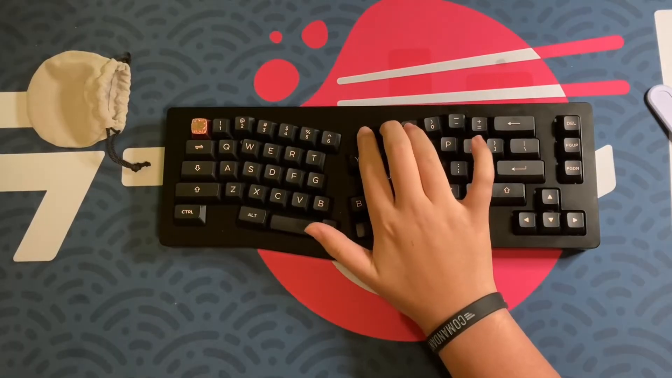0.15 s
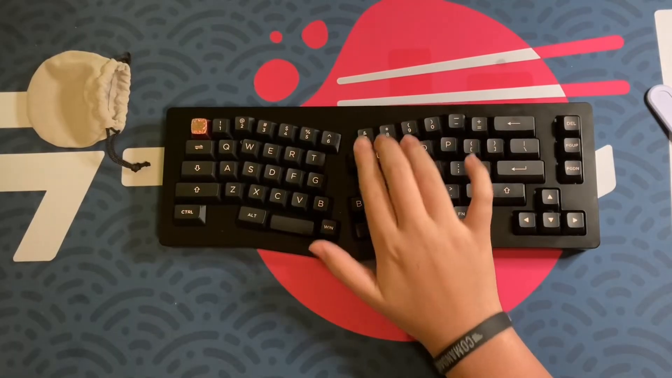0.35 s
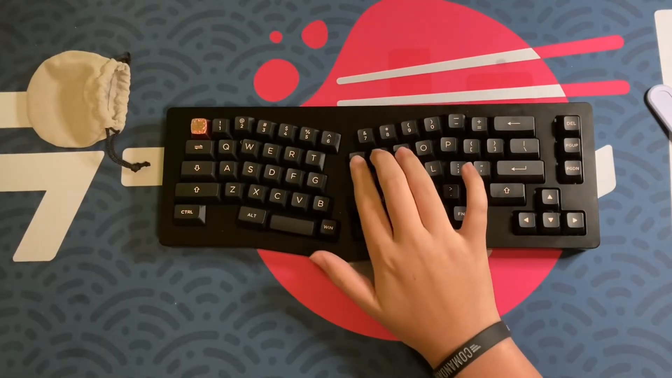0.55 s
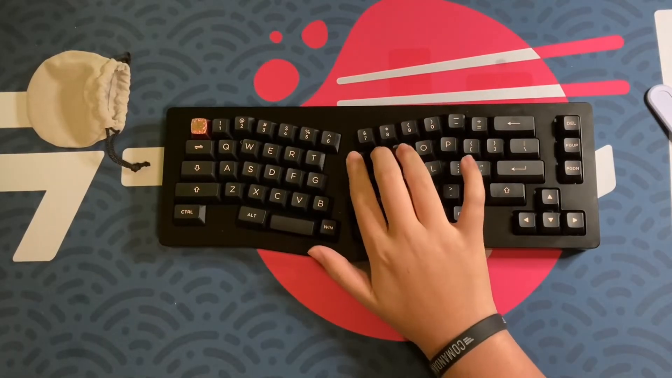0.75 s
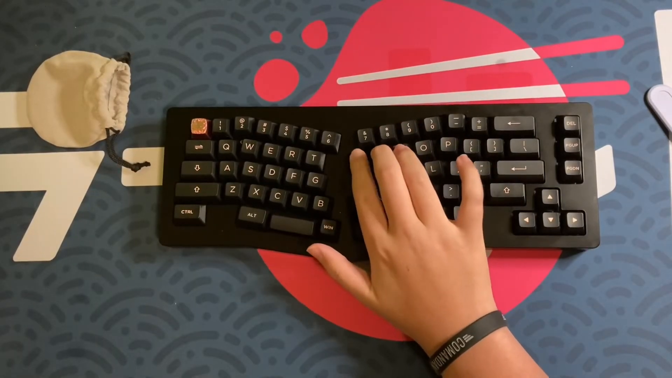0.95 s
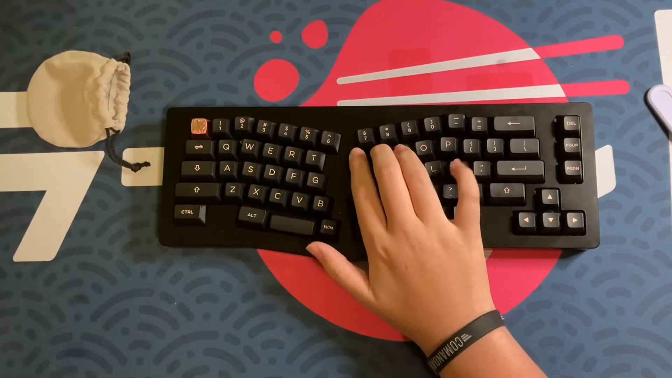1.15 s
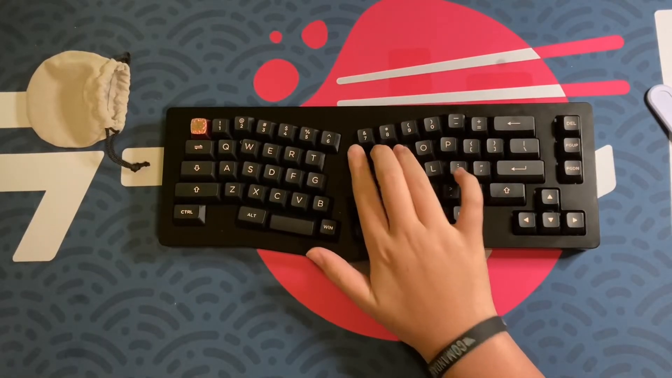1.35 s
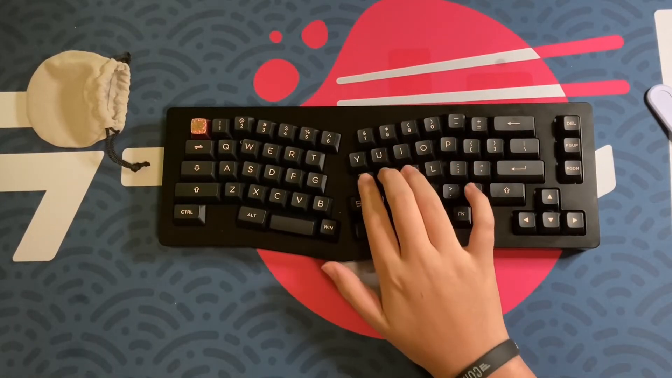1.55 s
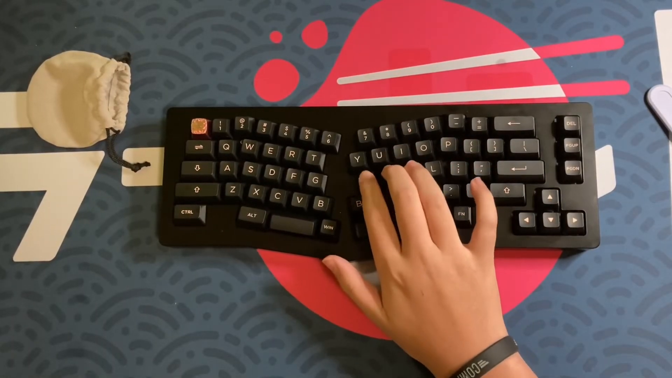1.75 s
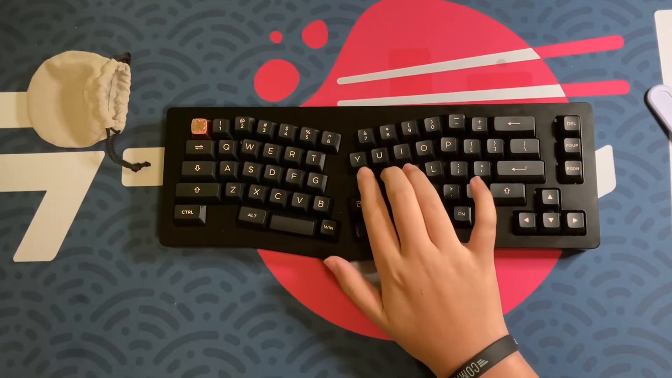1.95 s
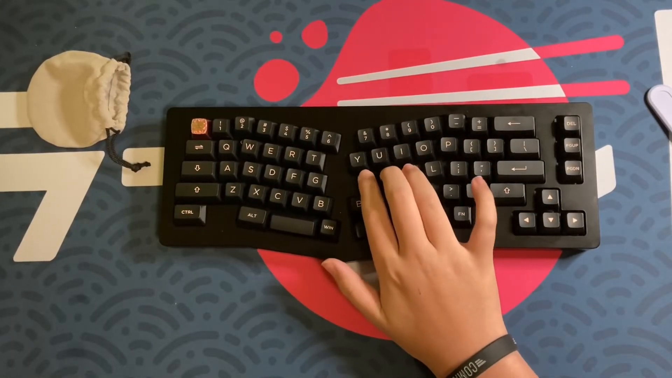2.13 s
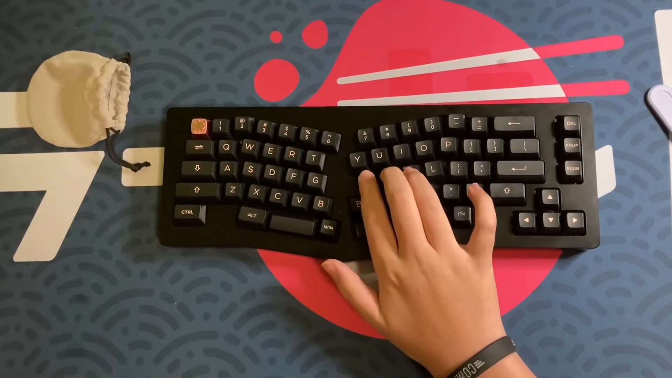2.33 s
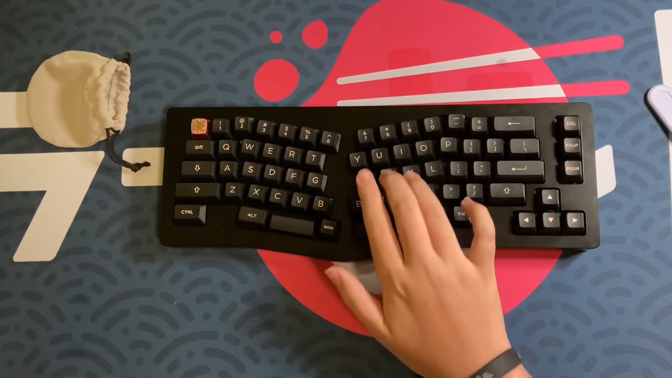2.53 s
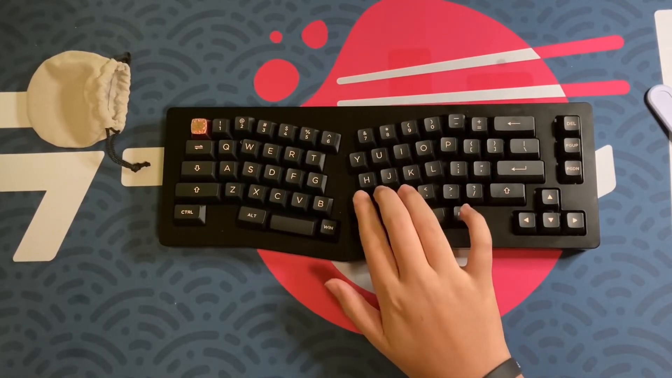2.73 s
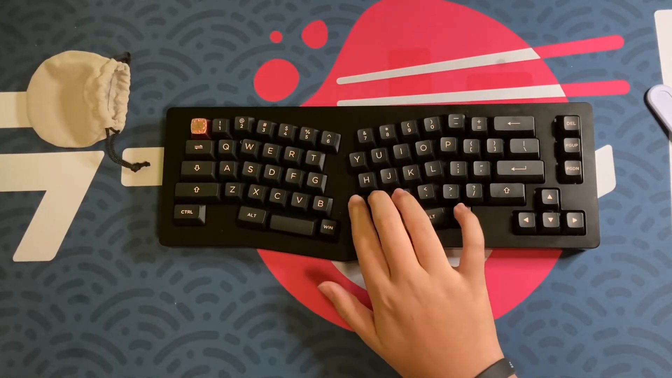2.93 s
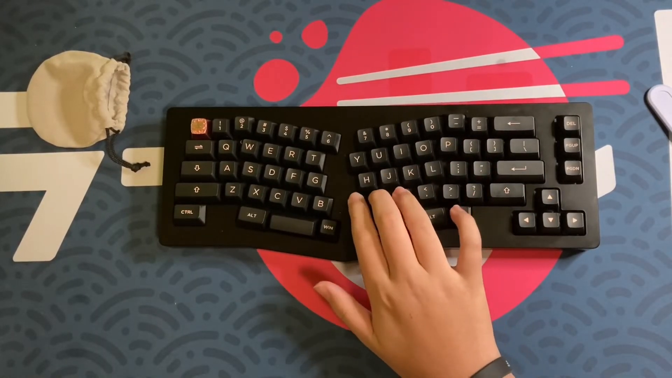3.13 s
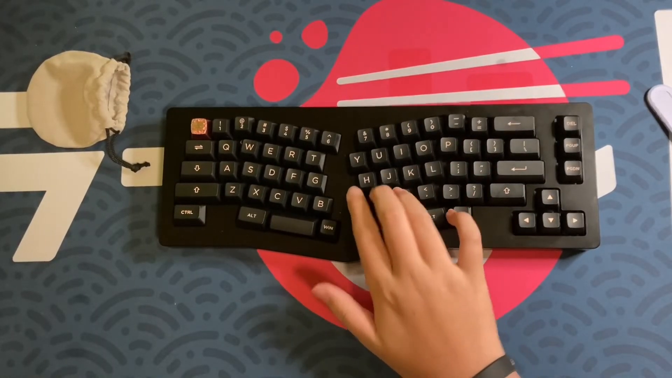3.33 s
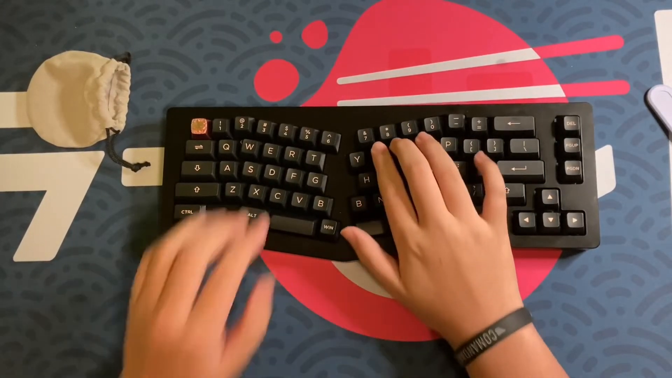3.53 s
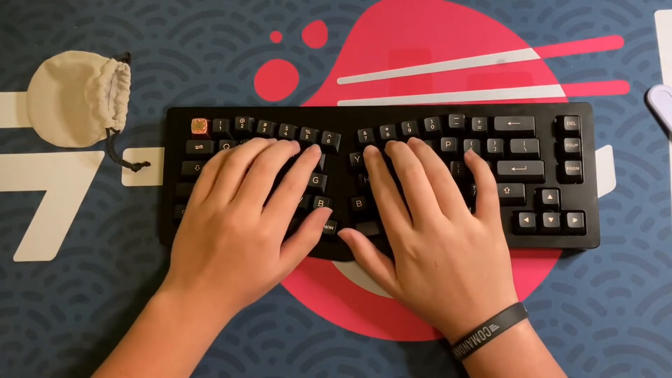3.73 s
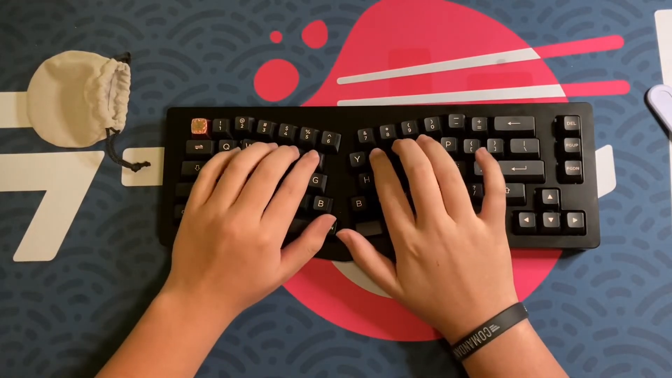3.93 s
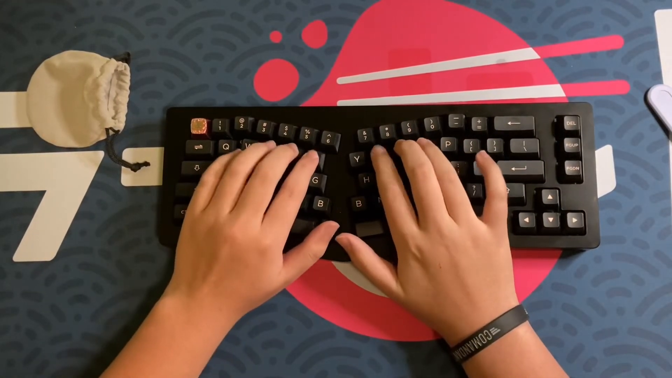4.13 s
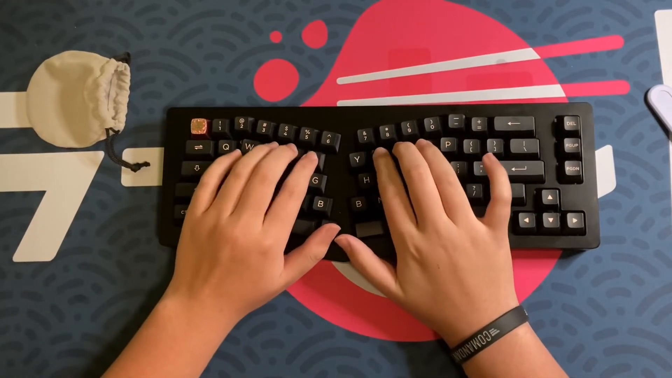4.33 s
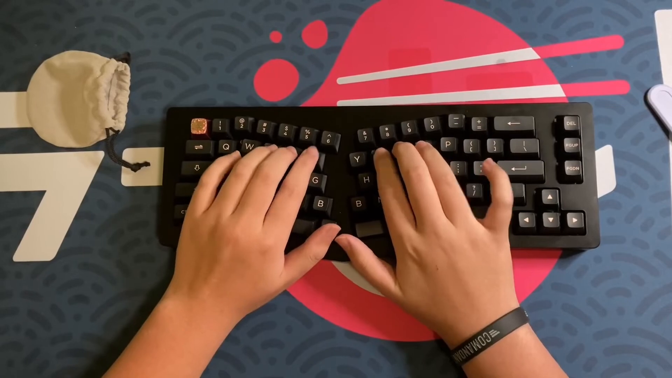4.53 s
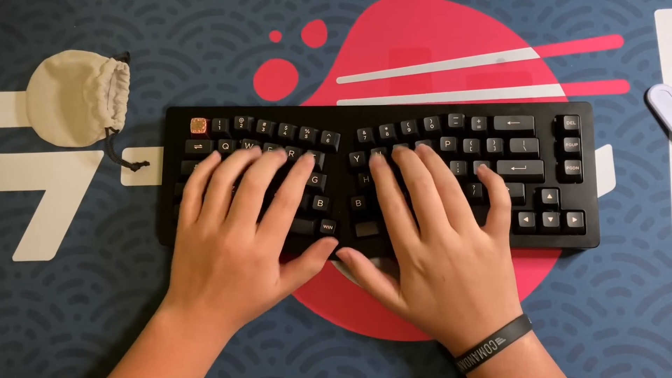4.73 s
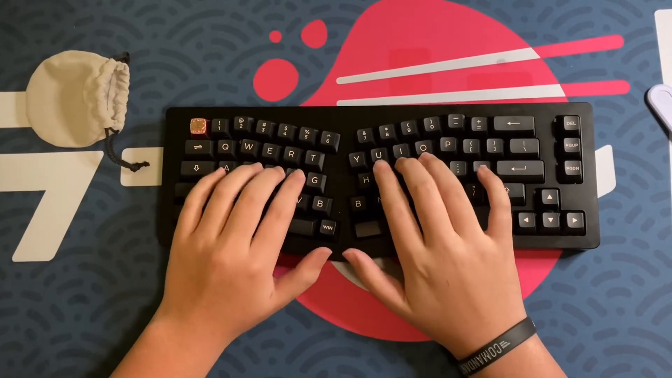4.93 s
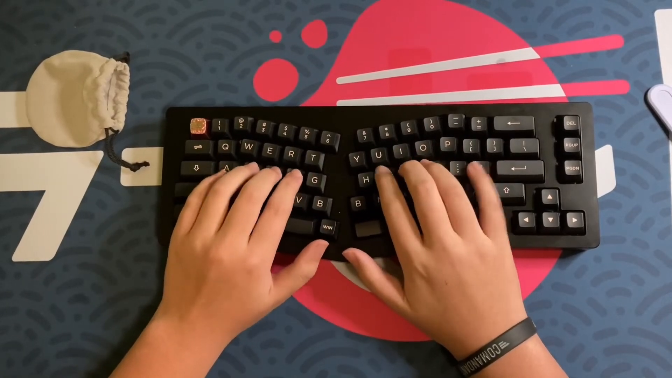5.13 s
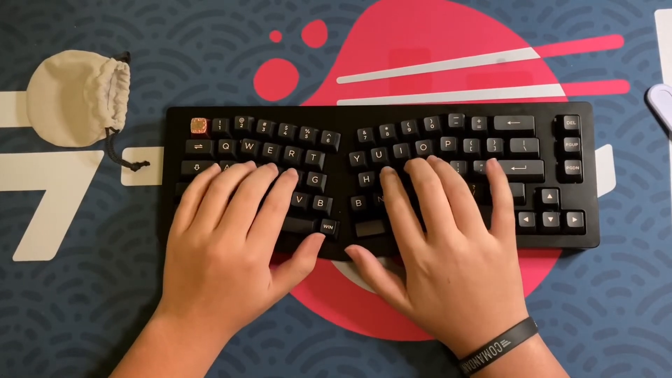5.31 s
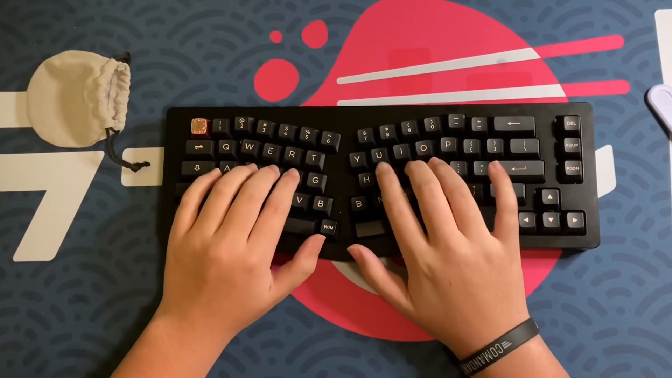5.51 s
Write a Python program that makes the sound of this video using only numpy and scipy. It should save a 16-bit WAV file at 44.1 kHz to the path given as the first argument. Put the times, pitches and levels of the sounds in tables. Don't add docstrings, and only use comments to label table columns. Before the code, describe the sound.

Close, fast keystrokes on a heavy mechanical keyboard: short plastic knocks with small bright ticks and a faint case ring. One hand drums in several bursts, a soft wrist brush crosses the desk mat, then both hands hammer two denser, louder bursts split by a short pause. Stereo phone microphone above the desk, small quiet room, low hum and hiss.

```python
import sys
import numpy as np
from scipy import signal
from scipy.fft import rfft, irfft, next_fast_len
from scipy.io import wavfile
from scipy.ndimage import uniform_filter1d

SR = 44100
rng = np.random.default_rng(int(sys.argv[2]) if len(sys.argv) > 2 else 0)


def wrap_up_sound(samples):
    columns = np.atleast_2d(samples).T
    tamed = np.clip(columns, -1, 1)
    steps = np.round(tamed * 32767).astype(np.int16)
    wavfile.write(sys.argv[1], SR, steps)


def invert_db(level):
    return 10 ** (np.asarray(level, dtype=float) / 20)


N = 245627

# f/Hz, level/dB per Hz
HUM_SPECTRUM = [(24, -33), (40, 4.5), (134, 0.5), (168, -20.5), (206, -9), (239, -26.5), (271, -19),
                (485, -33.5), (578, -22.5), (2490, -31), (3460, -31.5), (4340, -37.5), (16500, -56)]
# f/Hz, likeness (1 = the same)
HUM_LIKENESS = [(40, 1), (150, 0.78), (400, 0.18), (1500, .2), (4000, 0.4), (7000, 0.54)]
# f/Hz, level/dB
HUM_BALANCE = [(60, 5), (200, 0.5), (700, 2), (2400, 0)]
# t/s, rumble level/dB, hiss change/dB
HUM_DRIFT = [(0.0, -62, 5), (0.11, -62, 6.5), (0.76, -73, 3.5), (1.05, -67, -1), (1.5, -74, 1.5),
             (1.54, -66.5, 4), (2.44, -71, 3), (3.05, -65, 3), (3.26, -75, -5), (3.3, -66, -5),
             (3.5, -74.5, 1), (3.57, -63, 2.5), (4.13, -72.5, 1), (4.17, -60.5, -2), (4.28, -76.5, -12),
             (4.45, -61.5, -0.5), (4.99, -71.5, 5.5), (5.06, -58, 1), (5.18, -78, -8), (5.57, -56.5, -7)]
# t/s, level/dB
WRIST_SLIDES = [
    [(3.45, -96), (3.502, -88.5), (3.524, -69), (3.676, -80.5), (3.682, -66.5), (3.75, -88)],
    [(4.68, -70.5), (4.712, -78), (4.788, -70.5), (4.872, -103), (4.9, -102)],
]
# f/Hz, level/dB per Hz
CLOTH_SPECTRUM = [(150, -36), (400, 6), (1500, 4), (4000, -4), (8000, -6.5), (11000, -9), (12000, -11.5),
                  (16000, -21)]
# f/Hz, t60/s
ROOM_DECAY = [(300, 0.33), (800, 0.28), (2000, 0.21), (6000, 0.27), (12000, 0.12)]
# delay t/s, knock left level/dB, knock right level/dB, tick level/dB
ECHOES = [(.0017, -7, -11.5, -14.5), (.0036, -11, -30, -10.5), (.0082, -4.5, -39, -28.5),
          (0.013, -25.5, -20, -18), (0.0145, -19, -24.5, -20.5), (.0225, -16, -29.5, -32.5),
          (0.0295, -22.5, -31.5, -30.5)]
# t/s, knock level/dB, tick above knock/dB, deep above bright/dB, left minus right/dB
KEY_CONTACTS = [(0.0, -34, -12, -4, -0.5), (0.0757, -43, -8.5, 2, -0.5), (0.0805, -46, -9, 4.5, -4),
                (0.1319, -31.5, -10.5, -5, -5.0), (0.1656, -43, -17.5, -3.5, -3),
                (0.1759, -31, -12.5, -10, -5), (0.2184, -38.5, -6.5, 1.5, -5.5),
                (0.2557, -41, -15.5, -2.0, -8), (0.2658, -39.5, -2, 1, -4), (0.6991, -31.5, -25, -6.5, -3.0),
                (0.7316, -33.0, -22.5, -7, -6), (0.7713, -26.5, -18.5, -11.5, -6.5),
                (0.7863, -35, -6.5, -3.5, 0), (0.8494, -30.5, -14, -6, -4.0), (0.8894, -47, -15, -1, 4),
                (0.9107, -29.5, -20.0, -6, -4.5), (0.959, -30.5, -20.5, -10.5, -0.5),
                (0.9749, -31, -15.0, -9, -5.5), (0.9884, -53, -22.5, -3.5, 6),
                (1.0004, -29.5, -9.5, -8.5, -5.5), (1.021, -60.5, -13, -8, 4.5), (1.053, -48.5, -20, 0, 1),
                (1.0938, -27.5, -18.5, -7.5, -4), (1.1241, -46, -14.5, -4.5, -4),
                (1.1316, -24, -14, -10.5, -0.5), (1.1706, -37, -18, -10, -1.5),
                (1.197, -45.5, -10.0, -20, 5.5), (1.2117, -30.5, -14, -10, -4.0),
                (1.2264, -47.5, -9.5, 1.5, 0.5), (1.2608, -25.0, -18.5, -8.5, -4.5),
                (1.2849, -22.5, -14.5, -8.5, 1), (1.339, -31.5, -11.5, -9.5, -3.5),
                (1.3825, -32.5, -6.5, -4.5, -2.5), (1.511, -60, -12, -1, -5), (1.745, -56.5, -15, -1.5, 0.0),
                (1.7903, -30, -16, -1.5, -2), (1.8252, -31, -14.5, -7, -2.5), (1.8431, -40, -13, -2, -10),
                (1.8607, -33, -9, -1.5, -3.0), (1.8745, -51, -4, 2, 3), (1.9234, -37.5, -9.5, 3, -3),
                (1.9315, -39.5, -20, -3, -3.0), (1.9632, -59, -1.5, -2, -2.0), (1.9675, -57.5, -10, 0, -6.0),
                (2.0059, -39.5, -18.5, 2.5, 2), (2.0325, -33.0, -21, -5.5, -8), (2.0472, -40.5, -9, 0, -0.5),
                (2.094, -47, -34, 2.5, -0.5), (2.1083, -40.5, -8.5, 1.5, -4.5), (2.124, -42, -29, 2.5, -4.0),
                (2.2136, -32.0, -15, -2.5, -1), (2.2263, -53.5, -4.5, -5.5, 14), (2.2722, -50, -21.5, 8, 3),
                (2.283, -36, -13, -1, -4), (2.3308, -23.5, -12.5, -5, 0.5), (2.373, -36.5, -22, -4.5, -8),
                (2.3832, -28, -9.5, -7, -2), (2.3952, -41.5, -5, -14, 0), (2.426, -30.0, -7, -6.5, -3.5),
                (2.4706, -34.5, -7.5, -2, 0), (2.486, -31.5, -6.5, -6.5, -9), (2.593, -57.0, -9, -2, 2),
                (2.6773, -47, -26.5, -3, -3), (2.6912, -43.5, -34.5, 0.5, 0), (2.7054, -52, -32.0, -14, -4),
                (2.828, -52.0, -19, -6, -7), (2.8458, -31, -22.5, -7.5, -5.0),
                (2.853, -43.5, -35.0, -10, 6.0), (2.9034, -33, -14.5, -1.5, -6.5), (2.925, -31, -18, -12, -2),
                (2.9592, -39, -17.5, 0, -4.0), (2.9678, -38.5, -26.5, -18.5, 2), (3.0169, -45, -12, 8, -2),
                (3.0265, -32.5, -25, -17.5, -4.5), (3.0993, -24, -13.5, -8.5, -2.5),
                (3.1776, -31, -10.5, -2.5, -4), (3.2044, -56.5, -8, -11.5, 0.5), (3.2252, -28, -12.0, -4, -7),
                (3.233, -34.5, -18.5, -12, 6), (3.2599, -25.0, -11.5, -9.5, -3.0),
                (3.3104, -46, -10.5, -15.5, 6), (3.3198, -26.0, -10, -5.5, -5), (3.3318, -27, -2.5, -8, -8.5),
                (3.3507, -23.5, -16.5, -23, -5.0), (3.4138, -61, -24, -3, 2.0),
                (3.6015, -56, -6.5, 5, -2), (3.6233, -51.5, -17, -3.5, -7), (3.686, -60.5, 7, -2, -2),
              (3.7313, -42.5, -26, -4, -6), (3.7388, -54.5, -35, 6, 4), (3.9066, -64, -0.5, -7.0, -2),
              (3.9197, -21, -17.5, -8.5, -3.5), (3.9411, -22.5, -16.5, -13, 1),
              (3.9669, -27, -23.5, -12.0, -4.0), (3.9856, -30, -15, -16, -5.0),
              (4.0, -27.5, -13, -11, -4.0), (4.0398, -30.5, -11, -5, -8), (4.047, -37, -23, -6.0, 0),
              (4.069, -49, -25.5, -7.0, -1.0), (4.0942, -31.0, -11, -9.5, -2), (4.1026, -38, -14, -2, -3),
              (4.1318, -54.5, -8, -8, 3.0), (4.1459, -20.5, -18, -14, -4.0), (4.16, -28, -10.5, -11, -7),
              (4.182, -21.5, -17.0, -13.5, -4), (4.191, -35.5, -17.5, -21, 6),
              (4.2146, -28.5, -18.5, -11.5, -17), (4.2241, -29.5, -7, -9.0, 0),
              (4.248, -34.5, -13.5, -1.5, -1), (4.255, -31.5, -25.5, -8.0, -4), (4.2866, -41.5, -15, -1, 4),
              (4.2942, -34, -17.5, -7.0, -2.0), (4.2998, -40, -20.5, -2, -8),
              (4.334, -24.0, -16.0, -9.5, -5), (4.361, -34.5, -17, -11, -3.0), (4.3822, -22, -14, -13, -1),
              (4.3937, -20, -16, -13.5, -4), (4.421, -33, -10.5, -4, -3.0), (4.466, -35, -22, -7, -5),
              (4.4713, -37.5, -6, -5, -1), (4.4845, -41, -34, -13, -4), (4.5092, -26, -16.5, -7, -3.5),
              (4.55, -18.5, -19.5, -21, -5.0), (4.5562, -26, -8.5, -6.5, -5), (4.5804, -29, -23, -20, -2.0),
              (4.6168, -31.5, -14, -8, -4.0), (4.635, -38.5, -21, -4, -6), (4.6399, -33.5, -16, -5, 0),
              (4.6499, -29, -18, -18.5, -10.5), (4.658, -48, -17, 4, 2), (4.6769, -43, -12.5, -7, -5.0),
              (4.7883, -52.5, -20, -2, -3.5), (5.0172, -65.5, -2, 7, 13.5), (5.0282, -46.5, -5.5, -13, -12),
              (5.038, -19, -10, -8.0, -1.5), (5.0535, -32, -25.5, -5.5, -2), (5.0635, -38.5, 0.5, -6, -5),
              (5.1062, -51, -12, 9, -4), (5.13, -30, -8, -9.5, -9), (5.1351, -23.5, -15.5, -10, 0),
              (5.1577, -51, 1.5, 1, -4.0), (5.173, -35.5, -3.5, -5, -10), (5.1855, -34, -7, 1, -3),
              (5.2371, -52, -4, -10, -4), (5.2517, -24.0, -15, -6.0, -5.5), (5.2562, -30.0, -10, -15, 9),
              (5.2743, -31.5, -14, -12.0, -22), (5.2965, -28.5, -10, -4, -2.0),
              (5.3347, -25.5, -6.0, -6.5, -7), (5.3589, -26.5, -12, -3.5, -4),
              (5.3772, -43, -11.5, -12, -3.0), (5.4125, -47.5, -7, -12, -1), (5.4285, -27.5, -7.5, -3, -4),
              (5.4565, -34, -10, -1, -1), (5.4655, -22.5, -28.5, -14.5, -3), (5.4805, -40, -2, 5, -4),
              (5.4855, -32, -3.5, 0, -2.0), (5.4926, -32, -7.5, -7.5, -13),
              (5.5475, -22.5, -13.5, -11.5, -3)]
# f/Hz, level/dB, t60/s
CAP_DEEP = [(573, -17.5, 0.014), (822, -2.5, 0.013), (1093.4, 11, 0.0082)]
# f/Hz, level/dB, t60/s
CAP_BRIGHT = [(1701, 1.5, 0.0072), (2202, 4.5, 0.0051), (2773, -4, 0.0059), (3500, -12, 0.004)]
# f/Hz, level/dB, t60/s
CASE_MODES = [(748, -1, 0.085), (890, -11.5, .12), (1010, -4, .13), (1160, -9, .12), (1245, -9, .12),
              (1612, -2, .11), (1810, -11.5, .11), (1960, 2, .11), (1940, 7.5, .11), (2080, 11, 0.15),
              (2250, -2, .1), (2380, -6.5, .09), (2580, 6.5, 0.15), (2780, -5.5, .1), (2994, -16, .11),
              (3430, -11.5, .1)]
# f/Hz, level/dB per Hz
TICK_SPECTRUM = [(2000, -32), (3500, -8.5), (4700, -1.5), (6000, -5.5), (7500, -13.5), (8800, -10.5),
                 (10000, -4.5), (11200, 1), (11900, -11.5), (14000, -18), (16000, -32.5)]
# f/Hz, level/dB per Hz
STEM_SPECTRUM = [(300, -25), (1000, -8.5), (2200, -4), (3200, -6), (5000, -19.5), (11000, -29.5),
                 (14000, -41)]
# f/Hz, phase/radians
LEFT_LEAD = [(0, 0), (2800, .3), (5600, 3.1), (8400, 6.3), (11800, 9.4), (15000, 12.6), (17000, 14.6)]


def unit(x):
    return x / np.sqrt(np.mean(x ** 2) + 1e-20)


def along(points, hz):
    f, value = np.transpose(points)
    return np.interp(np.log(hz + 1), np.log(f + 1), value)


def filtered(x, response):
    m = next_fast_len(N + SR // 2)
    hz = np.fft.rfftfreq(m, 1 / SR)
    return irfft(rfft(x, m) * response(hz), m)[..., :N]


def coloured(x, spectrum):
    gains = invert_db(along(spectrum, np.linspace(0, SR / 2, 500)))
    mean = np.sqrt(np.mean(gains ** 2))
    return filtered(x, lambda hz: invert_db(along(spectrum, hz)) / mean)


def noise_pair(spectrum, likeness):
    def response(hz):
        turn = np.arccos(np.clip(along(likeness, hz), -1, 1)) / 2
        return invert_db(along(spectrum, hz)) * [np.cos(turn), np.sin(turn)]

    mid, side = filtered(rng.standard_normal((2, N)), response)
    return unit(np.array([mid + side, mid - side]))


def hum():
    t = np.arange(N) / SR
    s, rumble_db, hiss_db = np.transpose(HUM_DRIFT)
    tilt = lambda hz: invert_db(np.outer([0.5, -0.5], along(HUM_BALANCE, hz)))
    steady = filtered(noise_pair(HUM_SPECTRUM, HUM_LIKENESS), tilt)
    rumble = filtered(steady, lambda hz: 1 / (1 + (hz / 170) ** 6))
    hiss = steady - rumble
    swell = invert_db(np.interp(t, s, rumble_db) - 0.7) * unit(rumble)
    return swell + invert_db(-58 + np.interp(t, s, hiss_db)) * hiss


def wrist():
    t = np.arange(N) / SR
    stroke = np.zeros(N)
    for rows in WRIST_SLIDES:
        stroke += invert_db(np.interp(t, *np.transpose(rows), left=-200, right=-200))
    catches = invert_db(1.3 * unit(uniform_filter1d(rng.standard_normal(N), size=300)))
    cloth = noise_pair(CLOTH_SPECTRUM, [(1000, 0.19), (5000, 0.84)])
    return invert_db(9.5) * stroke * catches * cloth


def room(x, alike):
    own, shared = rng.standard_normal((2, SR // 2)), rng.standard_normal(SR // 2)
    noise = alike * shared + np.sqrt(abs(1 - alike ** 2)) * own
    hz, t, z = signal.stft(noise, SR, nperseg=256)
    decay = invert_db(-60 * t / along(ROOM_DECAY, hz)[:, None])
    tail = signal.istft(z * decay, SR, nperseg=256)[1]
    build_s = 0.0022
    tail = tail * (1 - np.exp(-np.arange(tail.shape[1]) / SR / build_s))
    tail = tail / np.linalg.norm(tail[0])
    return signal.fftconvolve(x * np.ones((2, 1)), tail, axes=1)[:, :N]


def surfaces(knock, tick):
    delay, left_db, right_db, tick_db = np.transpose(ECHOES)

    def copies(hz, levels_db):
        late = [invert_db(db) * np.exp(-2j * np.pi * hz * d) for d, db in zip(delay, levels_db)]
        return 1 + sum(late)

    knock_heard = filtered(knock, lambda hz: [copies(hz, left_db), copies(hz, right_db)])
    return knock_heard + filtered(tick, lambda hz: copies(hz, tick_db))


def ring(modes, t, scatter_db, detune, attack, spin):
    hz, db, t60 = np.transpose(modes)[:, :, None]
    pitch, strength, phase = rng.standard_normal((3, len(modes), 1))
    swing = -np.sin(2 * np.pi * hz * (1 + detune * pitch) * t + spin * phase)
    fading = invert_db(db + scatter_db * strength - 60 * t / t60)
    return (fading * swing).sum(0) * (1 - np.exp(-t / attack))


def cap_knock(t, deep_db):
    bright = ring(CAP_BRIGHT, t, scatter_db=2.64, detune=0.022, attack=0.00067, spin=0.92)
    deep = ring(CAP_DEEP, t, scatter_db=1.9, detune=0.074, attack=0.0009, spin=1.0)
    return bright / np.abs(bright).max() + invert_db(deep_db - 3) * deep / np.abs(deep).max()


def tick_burst(t):
    blow, rattle = invert_db(-60 * t / 0.0046), invert_db(-22.5 - 60 * t / 0.027)
    return (blow + rattle) * rng.standard_normal(len(t))


def keys(seats):
    knocks, ticks = np.zeros((seats, 2, N + SR)), np.zeros((seats, N + SR))
    case, stem = np.zeros((2, N + SR)), np.zeros(N)
    t, short = np.arange(SR // 5) / SR, np.arange(SR // 40) / SR
    for s, db, tick_db, deep_db, pan_db in KEY_CONTACTS:
        at, seat = round(s * SR), rng.integers(seats)
        end = at + len(short)
        sides = invert_db([[pan_db / 2], [-pan_db / 2]])
        knocks[seat, :, at:end] += invert_db(db + 3) * sides * cap_knock(short, deep_db)
        ticks[seat, at:end] += invert_db(db + tick_db + 6) * tick_burst(short)
        before = short[:min(len(short), at)][::-1]
        speed = invert_db(-60 * before / 0.041) + invert_db(5 - 60 * before / 0.0092)
        stem[at - len(before):at] += invert_db(db - 25) * speed
        plate = [ring(CASE_MODES, t, scatter_db=6, detune=0.0039, attack=0.002, spin=3) for _ in sides]
        case[:, at:at + len(t)] += invert_db(db - 31.5) * np.array(plate)
    scrape = coloured(stem * rng.standard_normal(N), STEM_SPECTRUM) * invert_db([[-3], [3]])
    return knocks[..., :N], coloured(ticks[:, :N], TICK_SPECTRUM), case[:, :N] + scrape


def scene():
    knocks, ticks, case = keys(seats=4)
    tails = np.zeros((2, N))
    for knock, tick in zip(knocks, ticks):
        tails += invert_db(-4) * room(knock.mean(0), alike=0.32)
        tails += invert_db(-9.5) * room(tick, alike=0.86)
    return hum() + wrist() + tails + surfaces(knocks.sum(0), ticks.sum(0)) + case


def band_limit(x):
    return signal.sosfilt(signal.butter(12, 16770, fs=SR, output="sos"), x)


def record(dry):
    def port_phases(hz):
        lead = np.interp(hz, *np.transpose(LEFT_LEAD))
        return np.exp(0.5j * np.outer([1, -1], lead))

    mix = filtered(dry, port_phases)
    return band_limit(mix)


dry = scene()
out = record(dry)
wrap_up_sound(out)
```